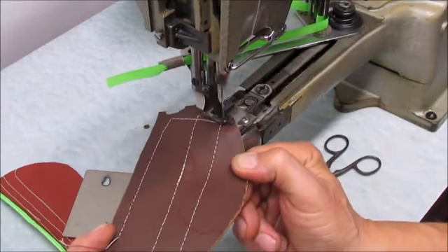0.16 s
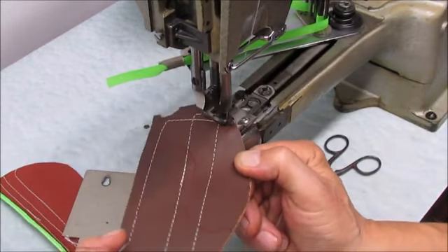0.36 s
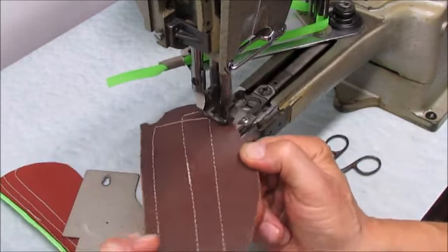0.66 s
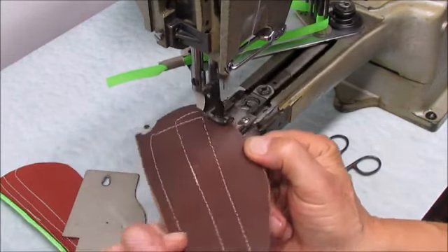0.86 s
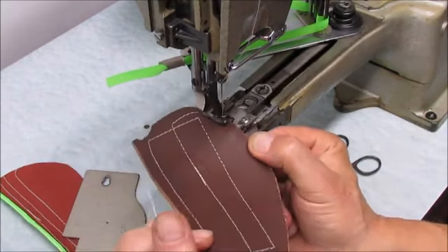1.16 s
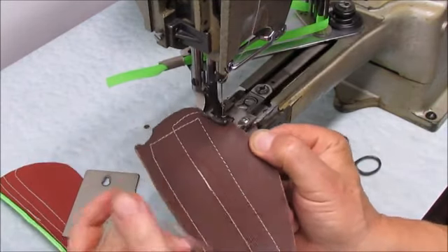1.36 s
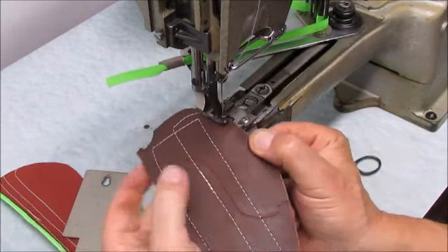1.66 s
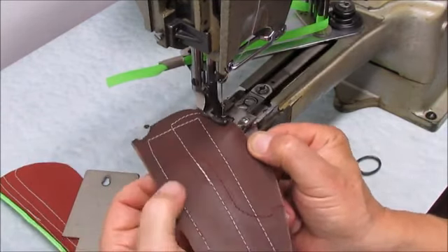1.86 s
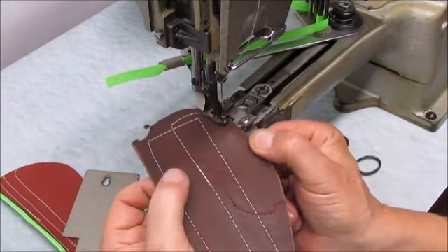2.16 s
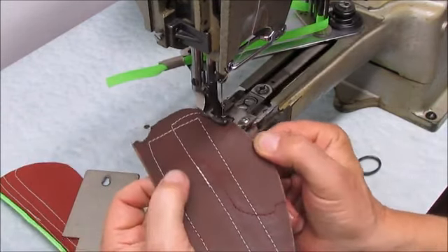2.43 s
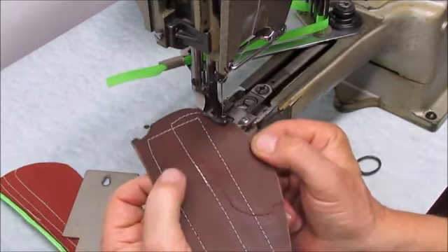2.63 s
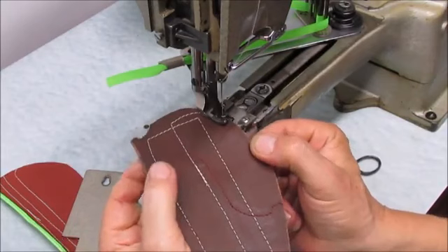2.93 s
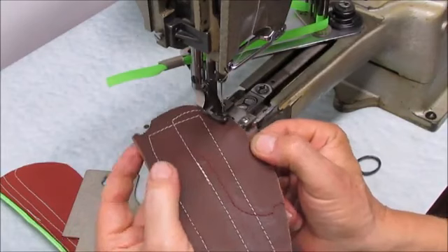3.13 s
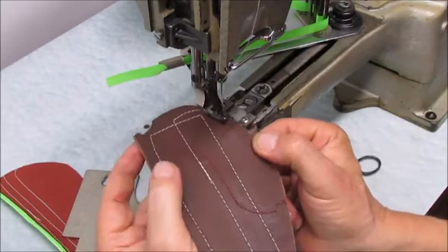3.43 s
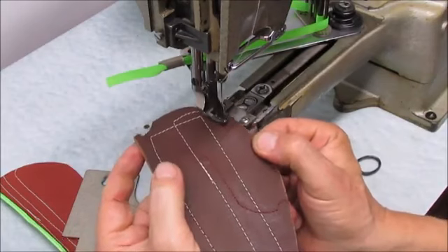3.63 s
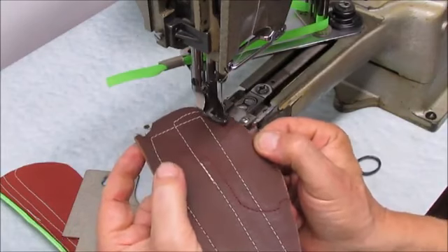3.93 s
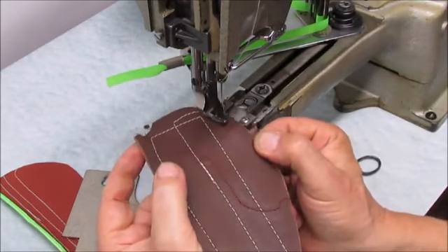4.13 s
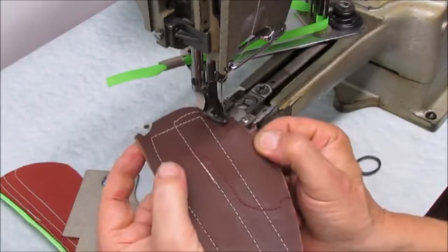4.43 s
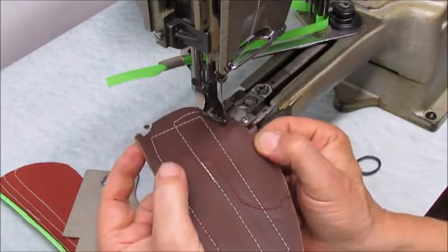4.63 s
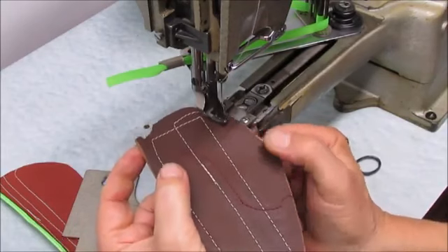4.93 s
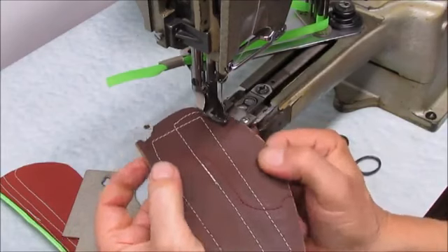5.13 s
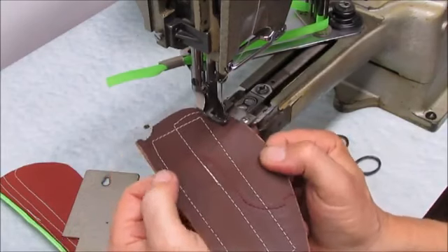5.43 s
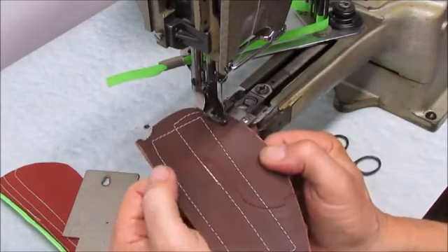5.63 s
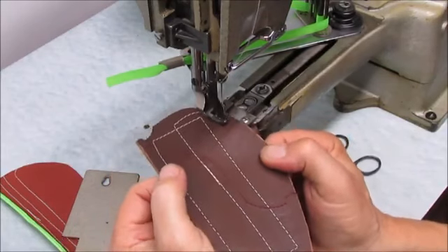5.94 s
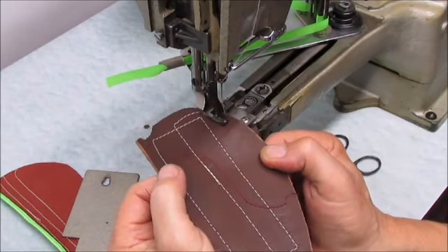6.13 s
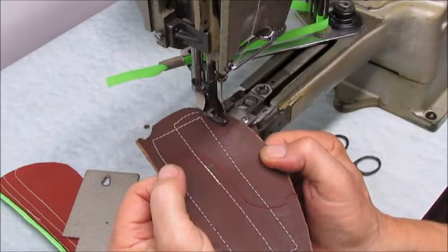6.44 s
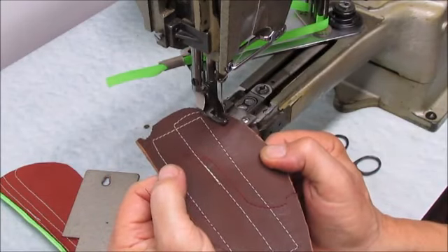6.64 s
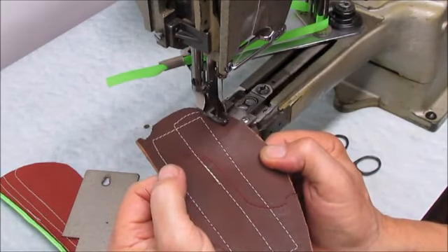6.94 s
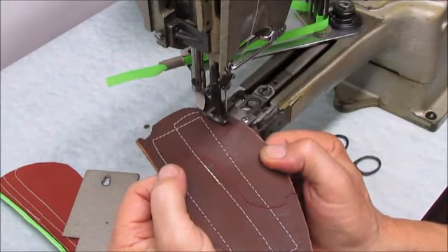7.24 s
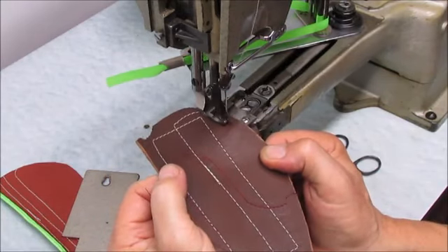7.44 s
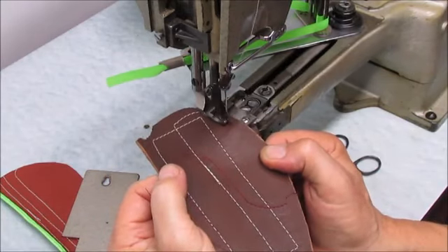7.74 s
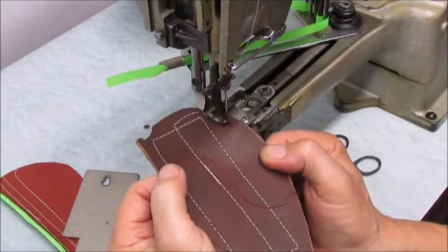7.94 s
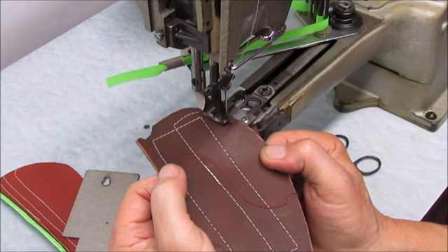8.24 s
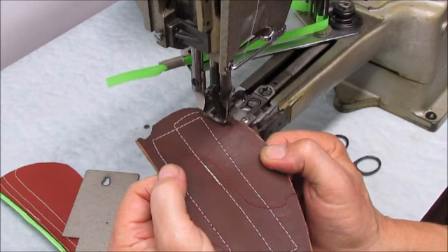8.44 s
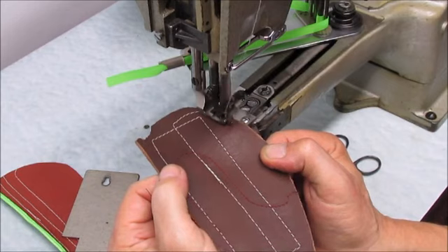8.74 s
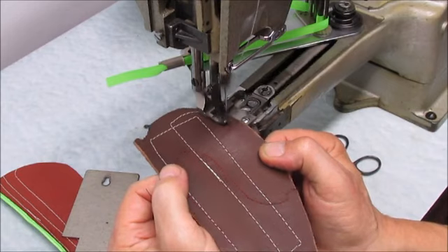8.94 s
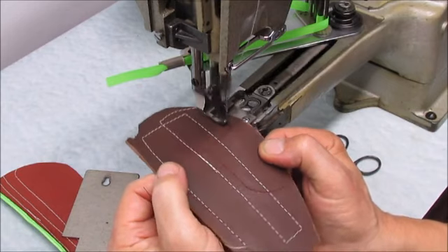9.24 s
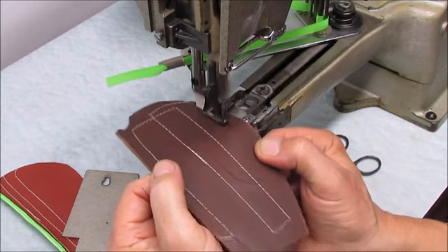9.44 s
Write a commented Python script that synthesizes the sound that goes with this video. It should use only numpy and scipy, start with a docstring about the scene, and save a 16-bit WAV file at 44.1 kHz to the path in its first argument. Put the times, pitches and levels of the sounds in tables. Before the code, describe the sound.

Close by in a workshop, an industrial sewing machine rattles and thumps through about a second of stitches in leather, then slows to a stop. Its electric motor keeps humming with a soft fan hiss. Two sharp metallic knocks with a low boom stand out among fainter clicks. The clutch rubs with a thin ringing, and near the end the machine clatters into a second short run.

```python
"""In a workshop, an industrial sewing machine close by punches two short runs of stitches into leather.
Its induction motor hums, its fan and bearings hiss, and between the runs the half-pressed clutch rubs
and rings its disc. The head (the metal body that carries the needle) rattles, and each stitch thumps
the table and clacks. Knocks and clicks ring in the room; the heavy ones make a bench boom."""
import sys
import numpy as np
from scipy import signal
from scipy.fft import rfft, irfft, next_fast_len
from scipy.io import wavfile

SR = 44100
rng = np.random.default_rng(int(sys.argv[2]) if len(sys.argv) > 2 else 0)


def persist_wave(psi):
    """Save psi, clipped to +-1, as 16-bit WAV."""
    counts = np.round(np.clip(psi, -1, 1) * 32767).astype(np.int16)
    wavfile.write(sys.argv[1], SR, np.atleast_2d(counts).T)


N = 422919
T = np.arange(N) / SR

# clutch pedal, loading the motor from 0 to 1: time_s, load
PEDAL = [(0, 0.9), (.25, 1), (.9, 0.9), (1.2, 0.02), (6.28, 0), (6.4, 0.63), (6.9, 0.67), (7.05, 0.85),
         (7.22, .35), (7.9, 0.34), (8.02, 0.33), (8.15, 0.57), (8.5, .9), (8.62, 0.75), (8.69, 0.1),
         (8.8, 0.57), (8.86, 0.97), (9.59, 1)]
# how loud the motor is: time_s, hum_db, lower_slot_tone_db
MOTOR_LEVELS = [(0, -39, -43), (.2, -44.5, -57), (.9, -33.5, -42.5), (1.9, -32, -39.5), (3.3, -32, -44.5),
                (4.5, -35, -41.5), (4.95, -34, -40.5), (5.2, -37.5, -42.5), (6.3, -34.5, -40),
                (6.6, -38.5, -45), (7.04, -37, -44.5), (7.25, -35, -40), (8.35, -39, -40), (8.5, -35, -51),
                (8.7, -33.5, -40), (9.59, -36.5, -58)]
# hum tones that the table gives off: cycles_per_turn, relative_db
HUM_TONES = [(3, -28), (4, -25.5), (5, -23), (6, -31), (7, -18.5), (8, -22), (9, 1), (10, -8), (12, -12.5),
             (13, -26), (14, -21.5), (15, -39), (17, -25), (18, -22), (19, -12), (20, -12.5), (21, -15.5),
             (22, -31), (23, -21), (24, -22), (27, -36), (31, -35), (36, -28), (38, -20.5)]
# the main hum tone dips when the load jerks: time_s, half_length_s, change_db
HUM_DIPS = [(6.42, 0.051, -7), (6.934, 0.0243, -4), (7.04, 0.053, -9), (8.57, 0.068, -3),
            (8.86, 0.043, -18.5)]
# thin steady tones: pitch_hz, level_db
WHINES = [(1523, -65.5), (3472, -70), (4398, -77), (4597, -76), (8995, -75.5), (10121, -81), (11763, -77),
          (11795, -79), (11822, -74)]
# tone colour of the fan and room noise: pitch_hz, relative_db
FAN_COLOUR = [(20, -17.5), (100, -18), (180, -16.5), (300, -13.5), (400, -11), (480, -10.5), (560, -13),
              (750, -19.5), (1200, -24), (3450, -37), (7900, -46), (12000, -47), (15300, -57)]
# hiss of the bearings: pitch_hz, width_hz, relative_db
BEARING_BANDS = [(11550, 350, 5), (10100, 150, -3), (9000, 150, 2), (4370, 140, -13)]
# clutch disc resonances in its three seats (ways of sitting): pitch_hz, width_hz, then each seat_db
DISC_MODES = [(1770, 190, -16, -4, -7), (2310, 22, -6, -12, 6), (2390, 50, -12, 0, 2),
              (2600, 150, -3, -1.5, 1), (3450, 47, -2, -16, -15), (4700, 34, -3, -21, -15),
              (5760, 810, -18, -8, -5.5), (6320, 150, -4, -2, -3), (6640, 300, -1, 0, -1.5),
              (7300, 310, -13, -3, -12), (7260, 53, -12, -7, -13), (8470, 65, -28, 7, 3),
              (8540, 140, -13, 1, -6), (9000, 170, -1, -18, -12), (9600, 46, -20, -2, 2)]
# thin tones of the disc: cycles_per_turn, then each seat_db
DISC_SQUEALS = [(91.6, -0.5, -14, -3), (102, -12, -2.5, -12), (105, -3, -10, -12), (196.2, -30, -6.5, -30)]
# the disc holds or runs free, so it does not rub: start_s, end_s
NO_RUB = [(.2, 6), (8.9, 9.59)]
# thin tones that die away: start_s, peak_db, pitch_hz, fade_s (time to fall 60 dB)
FADING_TONES = [(0, -43.5, 2663, 1.6), (.327, -18, 882, 0.12), (.914, -28, 4140, 0.031),
                (1.025, -38, 3260, 0.11), (1.026, -37, 3050, 0.09), (1.025, -31, 1750, .08),
                (1.149, -45, 3430, 0.049), (1.201, -42.5, 3360, 0.043), (1.197, -37.5, 1780, 0.045),
                (2.91, -56, 3250, .15), (3.011, -46, 2600, 0.15)]
# gear rattle, a list each for the first run, a nudge and the second run: time_s, level_db
RATTLE_LEVELS = [
    [(.15, -43.5), (.234, -39), (.24, -30.5), (.58, -24.5), (.8, -27), (.95, -37), (1.04, -35.5),
     (1.12, -42.5), (1.3, -61)],
    [(8.35, -61), (8.5, -42.5), (8.62, -51), (8.89, -55)],
    [(8.89, -57), (8.915, -37), (8.97, -31), (9.035, -33.5), (9.05, -30.5), (9.3, -20.5), (9.59, -24.5)],
]
# tone colour of the rattle: pitch_hz, relative_db
RATTLE_COLOUR = [(260, -36), (450, -26), (499, 3.5), (587, -4.5), (652, 0), (1050, -2.5), (2820, -8.5),
                 (12400, -26), (15500, -34)]
# resonances of the cast metal head: pitch_hz, width_hz, emphasis
HEAD_MODES = [(805, 154, -7), (1190, 89, 2), (1840, 280, 13), (2250, 160, 3), (2704, 220, 5),
              (4250, 82, -9), (4630, 120, -15), (5220, 70, -14), (6760, 96, -14), (7800, 55, -16)]
# slack is taken up as the head starts or stops: start_s, thump_db, clack_db
SLACK_BLOWS = [(0.2379, -17, -27), (0.2613, -48, -16), (1.149, -38, -50), (1.196, -43, -51),
               (8.592, -20.5, -50), (8.9362, -37, -26), (8.9535, -36, -21.5)]
# stitches, a list for each run: needle_bar_strike_s, feed_db, bar_db, hook_db, lever_db
STITCHES = [
    [(.243, -24, -16, -15.5, -50), (.361, -14, -9.5, -14.5, -16), (.469, -16, -9, -19, -22),
     (.565, -28, -8, -15, -15), (.656, -27, -8, -16.5, -19), (.751, -24, -9.5, -12.5, -14),
     (.868, -21, -13, -15, -18), (.985, -39, -23, -51, -34), (1.128, -25, -30, -60, -44)],
    [(8.911, -23, -18.5, -20.5, -44), (9.079, -18, -11.5, -15.5, -18), (9.187, -18, -13.5, -12, -18.5),
     (9.277, -8, -9, -13.5, -39), (9.36, -9, -7.5, -19, -21), (9.443, -7.5, -6.5, -16, -31),
     (9.529, -11, -8.5, -11, -34), (9.612, -12, -13, -23, -28)],
]
# resonances of the sewing table: pitch_hz, relative_db, fade_s
TABLE_MODES = [(247, 16, 0.082), (304, 16.5, 0.13), (347.5, 9, 0.15), (491, 9, 0.06), (639, 12, 0.088)]
# knocks and clicks: start_s, level_db, decay_s, tilt_db_per_octave, room_db
KNOCKS = [(1.553, -47, 0.012, -15, -3), (2.338, -45.5, 0.017, -6.5, -2), (2.486, -47.5, 0.015, -2, 0),
          (2.867, -48, 0.034, -10, 1.5), (3.059, -16, 0.003, -3, -15), (3.063, -12.5, 0.0024, 1, -5),
          (3.316, -51, 0.017, -2.5, 1), (3.659, -37.5, 0.0046, -5, -5), (4.582, -42, 0.016, 0.5, 7),
          (4.789, -35, 0.014, 1.5, 5.5), (4.935, -29, 0.0039, -5, 4), (4.945, -30, 0.016, 0, -2),
          (4.981, -15, 0.0036, -2, 5.5), (4.9825, -10, 0.0015, 1.5, -19), (5.202, -42.5, 0.011, 0.5, 5.5),
          (6.939, -37, 0.0031, -3, 8.5), (6.958, -42, 0.0046, -2, 0), (6.984, -36, 0.0043, 0, -2),
          (7.088, -28, 0.0045, -2, 0), (7.154, -33.5, 0.0049, -6.5, -1)]
# tone colour of a knock: pitch_hz, relative_db
KNOCK_COLOUR = [(50, -40), (150, -2), (500, 5), (1000, 11), (2000, 7), (4000, 4), (6800, 1.5), (8000, 4),
                (11000, 1.5), (15000, -7)]
# metal that the knocks ring: pitch_hz, width_hz, relative_db
METAL_MODES = [(1480, 25, -9), (2130, 57, 3.5), (2880, 75, 3), (3670, 93, 3), (4280, 81, 6), (6780, 190, 6),
               (8650, 60, 4), (11300, 590, -11)]
# bench booms: start_s, level_db, pitch_factor, lowest_mode_extra_db, second_mode_extra_db
BOOMS = [(2.868, -49, 1.35, 8, 7), (3.064, -26.5, 1.01, -20, -18), (3.661, -54, 1.1, -5, -6),
         (4.94, -40, 0.77, 0, -5), (4.984, -21.5, 0.96, 9, -2.5)]
# resonances of the bench: base_pitch_hz, width_hz, relative_db
BENCH_MODES = [(103.4, 2.1, -8.5), (229.5, 34, 3.5), (339, 49, 12.5), (491.6, 32, -4), (560, 88, -13),
               (770, 150, 0), (1420, 55, -18)]
# how long the room rings: pitch_hz, fade_s
ROOM_FADES = [(200, 0.33), (1000, 0.31), (3000, 0.26), (7000, 0.25), (14000, 0.15)]
# tone colour of the microphone: pitch_hz, gain_db
MIC_COLOUR = [(20, -11.5), (60, -11), (120, -1), (7780, 0), (7870, -14), (7960, 0)]

IDLE_TURNS_PER_S, SAG_TURNS_PER_S = 24.98, .18  # load slows the shaft
LOAD = np.clip(np.interp(T, *np.transpose(PEDAL)), 0, 1)
TURNS = np.cumsum(IDLE_TURNS_PER_S - SAG_TURNS_PER_S * LOAD) / SR


def gain_of(db):
    """Turns decibels into a gain."""
    return 10 ** (np.asarray(db) / 20)


def evened(x):
    """Scales a signal to an average (rms) level of 1."""
    return x / np.sqrt(np.mean(x ** 2) + 1e-20)


def at_pitch(points, hz):
    """Reads between the rows of a table on a musical (log) pitch scale."""
    pitches, values = np.transpose(points)
    return np.interp(np.log(hz + 1), np.log(pitches + 1), values)


def level(rows, column=1):
    """Gain over time from a column of decibels, silent outside the rows."""
    return gain_of(np.interp(T, *np.transpose(rows)[[0, column]], left=-200, right=-200))


def add(mix, start_s, sound):
    """Adds a sound to the mix at a given time."""
    part = mix[round(start_s * SR):][:len(sound)]
    part += sound[:len(part)]


def coloured(x, points, tilt_db=0):
    """Filters by a tone colour; a tilt above zero brightens it."""
    size = next_fast_len(len(x))
    hz = np.fft.rfftfreq(size, 1 / SR)
    curve_db = at_pitch(points, hz) + tilt_db * np.log2((hz + 300) / 3000)
    return irfft(rfft(x, size) * gain_of(curve_db), size)[:len(x)]


def resonances(x, modes):
    """Lets a signal ring modes, the pitches at which an object likes to shake."""
    return sum(gain_of(db) * signal.lfilter(*signal.iirpeak(hz, hz / width, SR), x)
               for hz, width, db in modes)


def wander(rate_hz):
    """Random drift of size 1, with about rate_hz new values a second."""
    steps = rng.standard_normal(int(N / SR * rate_hz) + 3)
    return evened(signal.resample(steps, N // 64)).repeat(65)[:N]


def ring(modes, spread, rise_s):
    """One blow on a set of modes, each a little out of tune."""
    t = T[:SR // 3]
    detunes = 1 + spread * rng.standard_normal(len(modes))
    tone = sum(gain_of(db - 60 * t / fade_s) * np.sin(2 * np.pi * hz * detune * t)
               for (hz, db, fade_s), detune in zip(modes, detunes))
    tone *= (1 - np.exp(-t / rise_s)) ** 2
    return tone / abs(tone).max()


def turning_noise(share):
    """Noise of which a share repeats with every shaft turn, as the same surface passes again."""
    surface = rng.standard_normal(1766)
    repeating = surface[(TURNS % 1 * len(surface)).astype(int)]
    return np.sqrt(share) * repeating + np.sqrt(1 - share) * rng.standard_normal(N)


def motor():
    """The shaft hums; the rotor's slots make a tone that the mains field splits in two."""
    main_tone, slot_count, twice_mains_hz = 9, 41, 100
    spin = TURNS + 0.0025 * np.sin(2 * np.pi * .355 * TURNS)  # the belt tugs once in each of its rounds
    sway = [wander(5.5) for _ in range(5)]
    dip_db = sum(db * np.exp(-((T - s) / half) ** 2) for s, half, db in HUM_DIPS)
    hum = 0
    for i, (multiple, db) in enumerate(HUM_TONES):  # neighbours partly out of step: warble and throb
        tone_db = db - db * 0.093 * sway[i % 5] + (multiple == main_tone) * dip_db
        cycles = multiple * spin + multiple ** 2 / 8 + 0.052 * sway[i % 3]
        hum += gain_of(tone_db) * np.sin(2 * np.pi * cycles)
    upper = np.sin(2 * np.pi * slot_count * TURNS) * gain_of(1.05 * sway[0])
    lower = np.sin(2 * np.pi * (slot_count * TURNS - twice_mains_hz * T)) * gain_of(1.1 * sway[1])
    lower_gain = level(MOTOR_LEVELS, column=2)
    upper_gain = gain_of(-47.5) * (gain_of(-43) / lower_gain) ** 0.22  # rises as the lower tone falls
    slots = gain_of(-3.5 * LOAD) * (lower_gain * lower + upper_gain * upper)
    whine = sum(gain_of(db + 0.71 * sway[i % 5]) * np.sin(2 * np.pi * hz * T)
                for i, (hz, db) in enumerate(WHINES))
    buzz = gain_of(-58) * np.sin(2 * np.pi * 1001 * T)
    return np.sqrt(2) * (level(MOTOR_LEVELS) * hum + slots + whine + buzz)


def fan_and_bearings():
    """The fan rushes and the bearings hiss, swelling a little with the hum."""
    fan = evened(coloured(turning_noise(0.23), FAN_COLOUR))
    rolling = turning_noise(.3)
    hiss = sum(resonances(resonances(rolling, [(hz, width, db)]), [(hz, width, 0)])
               for hz, width, db in BEARING_BANDS)
    swell = evened(level(MOTOR_LEVELS)) ** 0.6
    return gain_of(-42.5 + wander(4.9) / 2) * swell * (fan + gain_of(-16) * hiss)


def clutch():
    """Rubbing rings the clutch disc; each seat has its own surface and favours other modes."""
    change_s, low_modes_hz = 0.17, 3000
    # the disc's ringing changes colour at about 7.1 s and 8.05 s
    seat_now = np.where(T < 1, 2, sum(np.clip((T - s) / change_s + .5, 0, 1) for s in (7.1, 8.05)))
    slipping = np.prod([np.clip(np.maximum(start - T, T - end) * 10 + 1, 0, 1)
                        for start, end in NO_RUB], axis=0)
    high_spot = abs(np.cos(np.pi * (TURNS - .1))) ** 18  # shakes the low modes once a turn
    rub = 0
    for seat, pressure in enumerate((1.6, 3, 1.5)):
        scrape = turning_noise(0.89)
        bumped = scrape * (1 + pressure * high_spot)
        hiss = coloured(scrape, [(600, 16), (2000, 10), (7000, 2.5), (10000, -1.5), (15000, -7)])
        ringing = sum(resonances(bumped if hz < low_modes_hz else scrape, [(hz, width, seat_db[seat])])
                      for hz, width, *seat_db in DISC_MODES)
        squeal = sum(gain_of(seat_db[seat]) * np.sin(2 * np.pi * multiple * TURNS)
                     for multiple, *seat_db in DISC_SQUEALS)
        squeal *= gain_of(-12.5 + 3.9 * wander(26))
        blend = np.sqrt(np.clip(1 - abs(seat_now - seat), 0, 1))
        rub += blend * evened(ringing + squeal + gain_of(-11) * hiss)
    return gain_of(-43.5) * LOAD ** 0.78 * slipping * rub


def fading_tones():
    """An opening clutch squeal, then brief thin tones; each is a pair of close pitches."""
    out = np.zeros(N)
    for s, db, hz, fade_s in FADING_TONES:
        pair = [(hz, 0, fade_s), (1.03 * hz, -10, fade_s)]
        add(out, s, gain_of(db) * ring(pair, spread=.004, rise_s=.001))
    return out


def stitch_timing():
    """Each part strikes at its own point in a stitch: lists thumps, clacks and thread lever times."""
    feed_at, lever_at, rebound_at, hook_at = -.37, -.19, .22, .39  # in stitches from the bar's strike
    thumps = [(s, db) for s, db, _ in SLACK_BLOWS]
    clacks = [(s, db) for s, _, db in SLACK_BLOWS]
    lever_times = []
    for run in STITCHES:
        bar_s, feed_db, bar_db, hook_db, lever_db = np.transpose(run)
        padded_s = np.r_[2 * bar_s[0] - bar_s[1], bar_s, 2 * bar_s[-1] - bar_s[-2]]
        count = np.arange(len(padded_s))
        feed_s, lever_s, rebound_s, hook_s = (np.interp(count[1:-1] + share, count, padded_s)
                                              for share in (feed_at, lever_at, rebound_at, hook_at))
        thumps += [*zip(feed_s, feed_db), *zip(bar_s, bar_db), *zip(rebound_s, bar_db - 9)]
        clacks += [*zip(hook_s, hook_db), *zip(lever_s, lever_db)]
        clacks += zip(bar_s + .008, bar_db - 10.5)  # the bar clacks just after its thump
        lever_times += list(lever_s)
    return thumps, clacks, lever_times


def gear_rattle():
    """A stream of tiny metal hits rings the head; the table rumbles under it."""
    grains = rng.standard_normal(N) * gain_of(2 * wander(40) + 2.1 * wander(600))
    rattle = coloured(grains, RATTLE_COLOUR)
    ringing = resonances(rattle, [(hz, width, emphasis / 3) for hz, width, emphasis in HEAD_MODES])
    rattle = evened(rattle + gain_of(-6) * ringing)
    shake = rng.standard_normal(N) * gain_of(3 * wander(60))
    shake = resonances(shake, [(250, 800, 0)])
    rumble = evened(resonances(shake, [(229.7, 25, -2), (304.3, 16, -1), (339.6, 7.8, -4.5)]))
    loudness = sum(level(run) for run in RATTLE_LEVELS)
    lull_s, lull_db = 0.013, np.zeros(N)
    _, _, lever_times = stitch_timing()
    for s in lever_times:  # the rattle eases just before each lever clack
        add(lull_db, s - lull_s, -5 * np.sin(np.pi * T[:round(lull_s * SR)] / lull_s) ** .5)
    return loudness * gain_of(lull_db) * rattle + gain_of(-28) * (loudness / gain_of(-29)) ** .76 * rumble


def stitches():
    """The moving parts send low thumps through the table and bright clacks from the head."""
    out, t = np.zeros(N), T[:2000]
    thumps, clacks, _ = stitch_timing()
    from_peak_s = T[:SR // 3] - .0055
    blow = -np.cos(2 * np.pi * 285 * from_peak_s) * np.exp(-(from_peak_s / 0.0027) ** 2)
    for s, db in thumps:
        add(out, s, gain_of(db) * (blow + 0.35 * ring(TABLE_MODES, spread=0.022, rise_s=0.015)))
    envelope = (0.39 * np.exp(-t / 0.002) + 0.25 * np.exp(-t / 0.038)) * (1 - np.exp(-t / 0.0006))
    colour = [(300, 0), (700, -2.5), (1800, 0.5), (3000, -1), (8000, -1.5), (12500, -3.5), (15000, -15)]
    for s, db in clacks:
        burst = rng.standard_normal(len(t)) * envelope
        burst += gain_of(7) * resonances(burst, [(hz, width, 0) for hz, width, _ in HEAD_MODES])
        add(out, s, gain_of(db) * coloured(burst, colour))
    return out


def room(x):
    """The room's echo: a tail of noise whose treble dies first."""
    hz, t, bands = signal.stft(rng.standard_normal(SR // 2), SR, nperseg=128)
    fade = gain_of(-60 * t / at_pitch(ROOM_FADES, hz)[:, None])
    tail = np.r_[np.zeros(120), signal.istft(bands * fade, SR, nperseg=128)[1]]
    return signal.fftconvolve(x, tail / np.linalg.norm(tail))[:N]


def knocks():
    """Short bursts of noise ring nearby metal; gives the direct sound and what goes into the room."""
    direct, to_room, t = np.zeros(N), np.zeros(N), T[:SR // 2]
    light_modes = [mode for mode in METAL_MODES if mode[0] > 6000]
    for s, db, decay_s, tilt_db, room_db in KNOCKS:
        soft = decay_s > .008  # a soft knock wakes only the light parts
        envelope = np.exp(-t / decay_s) * (1 - np.exp(-9 * t / decay_s))
        burst = coloured(rng.standard_normal(len(t)), KNOCK_COLOUR, tilt_db) * envelope
        burst += resonances(burst, light_modes if soft else METAL_MODES)
        add(direct, s, gain_of(db) * burst)
        if not soft:  # to the room a brief knock is one click
            click = coloured(signal.unit_impulse(len(t), 100), KNOCK_COLOUR, tilt_db)
            burst = evened(click + resonances(click, METAL_MODES)) * np.std(burst)
        add(to_room, s, gain_of(db + room_db) * burst)
    return direct, to_room


def bench_booms():
    """After a heavy knock, a quickly swelling shake rings the low modes of a bench."""
    out, t = np.zeros(N), T[:SR // 2]
    for s, db, pitch_factor, *extras_db in BOOMS:
        shake = rng.standard_normal(len(t)) * (t / .007) ** 2 * np.exp(-t / 0.0054)
        extras_db += [0] * len(BENCH_MODES)
        boom = sum(gain_of(mode_db + extra) * evened(resonances(shake, [(hz * pitch_factor, width, 0)]))
                   for (hz, width, mode_db), extra in zip(BENCH_MODES, extras_db))
        add(out, s, gain_of(db) * boom / np.std(boom[:3000]))
    return out


def scene():
    """The machine in front, the workshop around it."""
    sewing = gear_rattle() + stitches() + fading_tones()
    machine = motor() + fan_and_bearings() + clutch() + sewing + gain_of(-9.5) * room(sewing)
    knocking, to_room = knocks()
    booms = bench_booms()
    return (machine + knocking + booms + room(to_room + gain_of(-2.5) * booms))[None]


def record(dry):
    """A microphone with weak bass and a narrow treble dip rounds off peaks; the top treble is cut."""
    heard = np.tanh(coloured(dry[0], MIC_COLOUR))[None]
    treble_cut = signal.firwin(511, 15300, window=("kaiser", 9), fs=SR)
    return signal.oaconvolve(heard, treble_cut[None], "same")


dry = scene()
out = record(dry)
persist_wave(out)
```